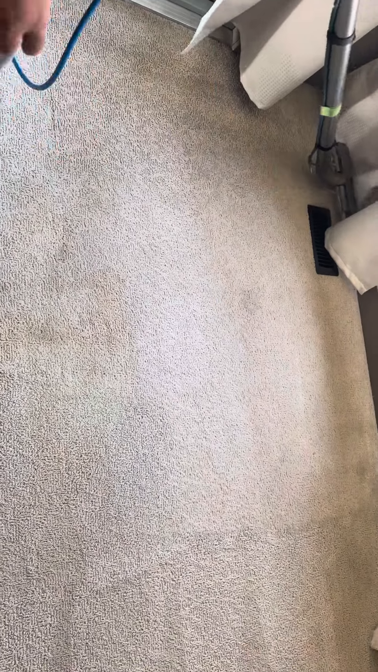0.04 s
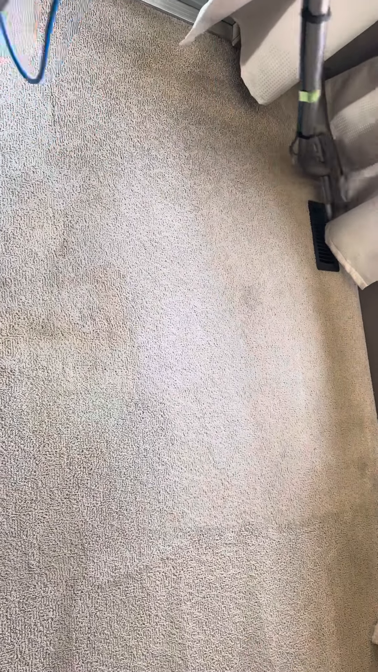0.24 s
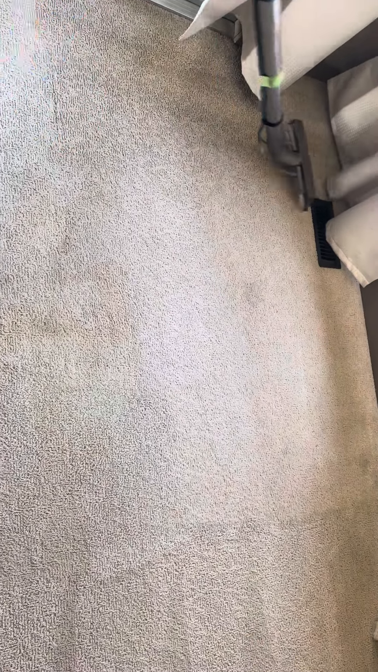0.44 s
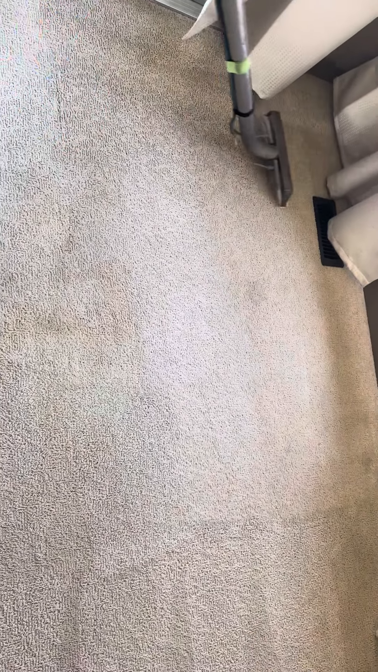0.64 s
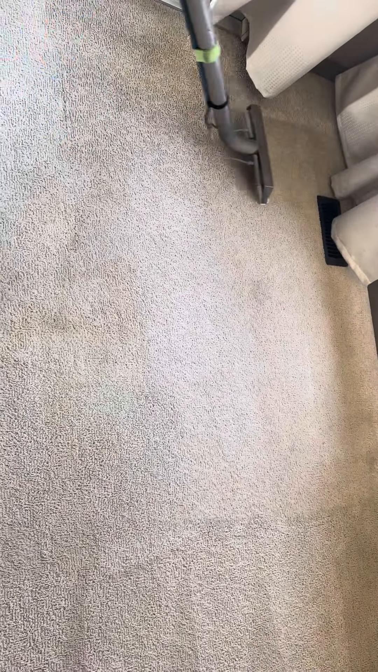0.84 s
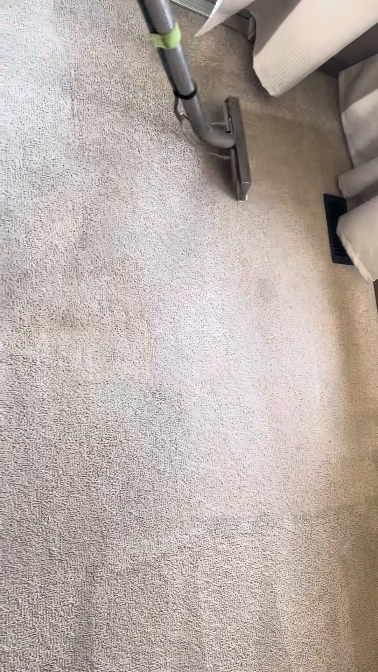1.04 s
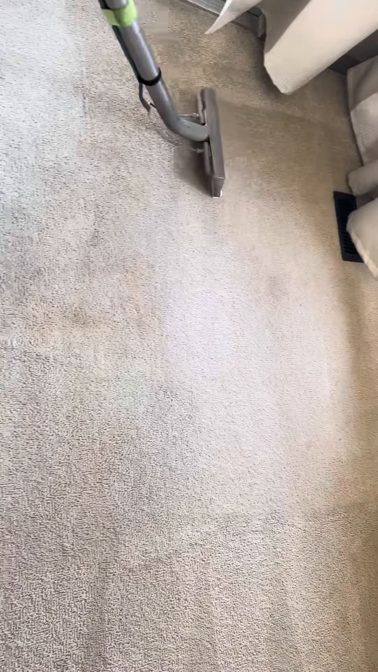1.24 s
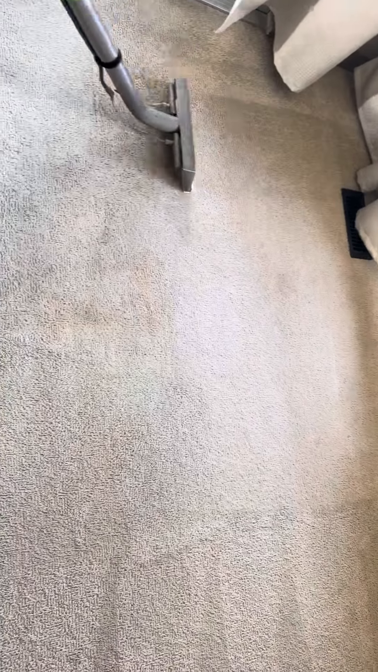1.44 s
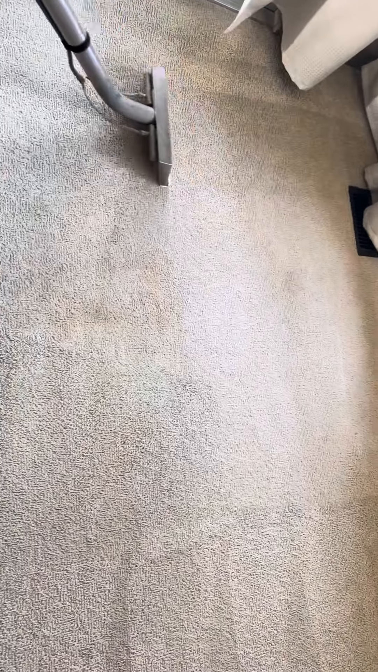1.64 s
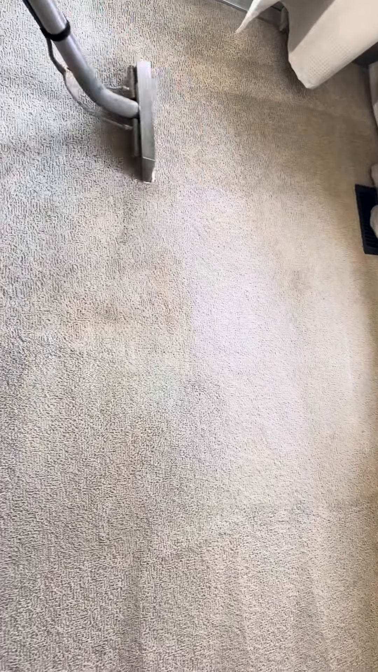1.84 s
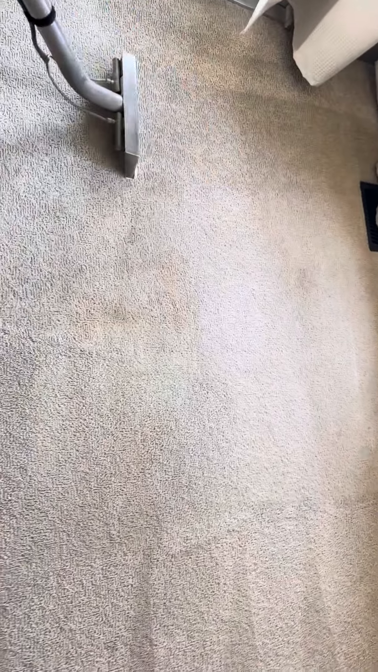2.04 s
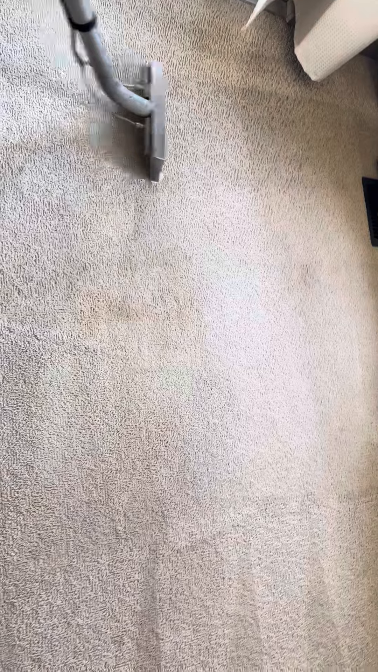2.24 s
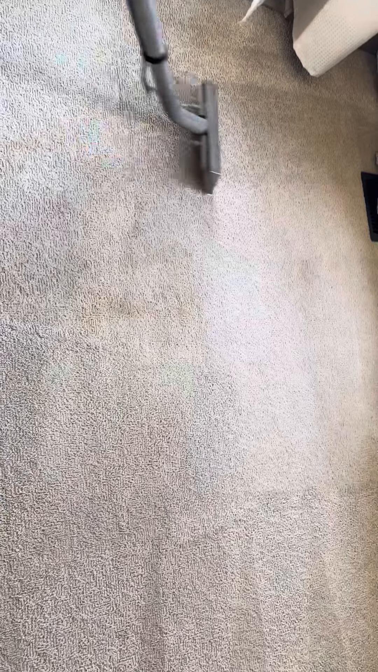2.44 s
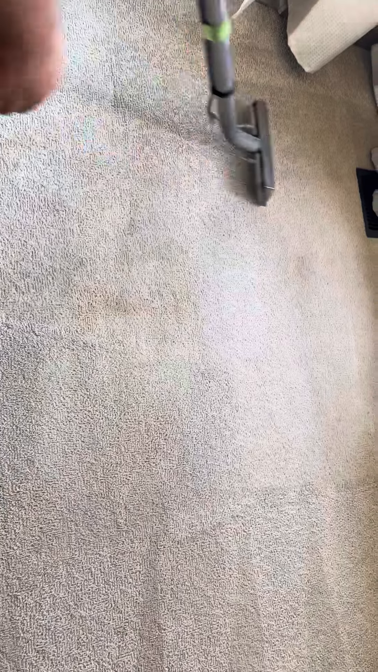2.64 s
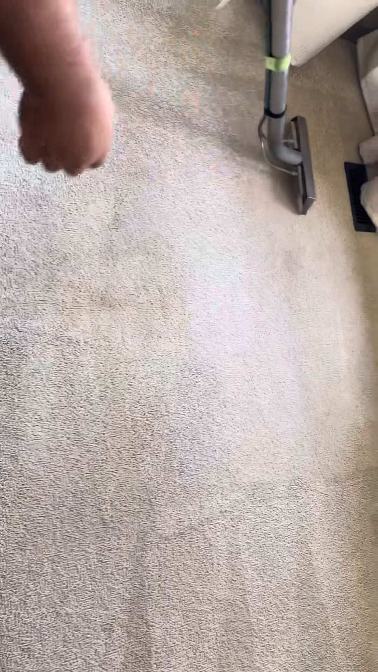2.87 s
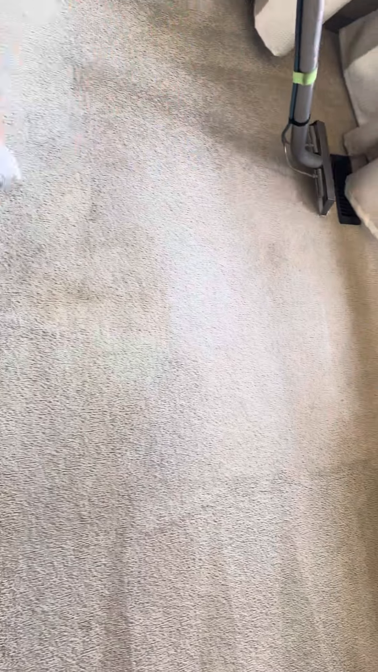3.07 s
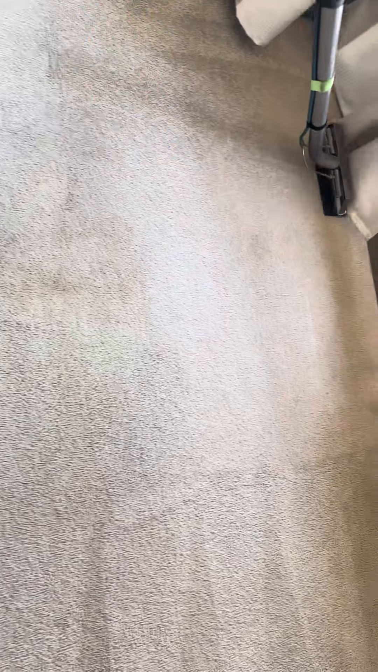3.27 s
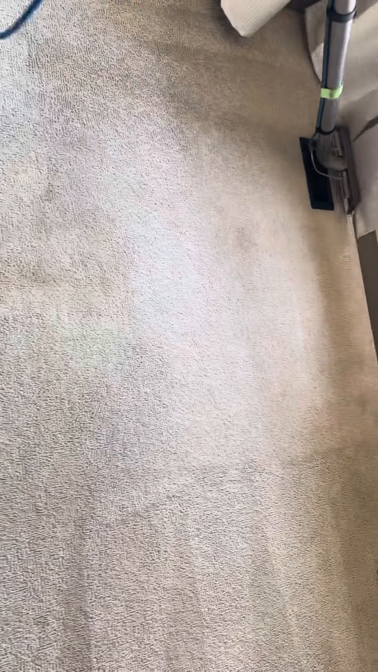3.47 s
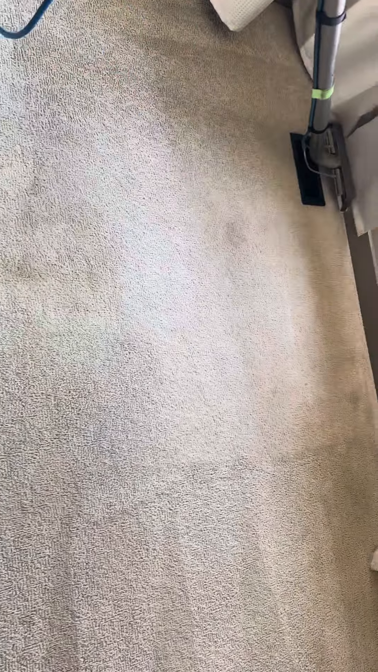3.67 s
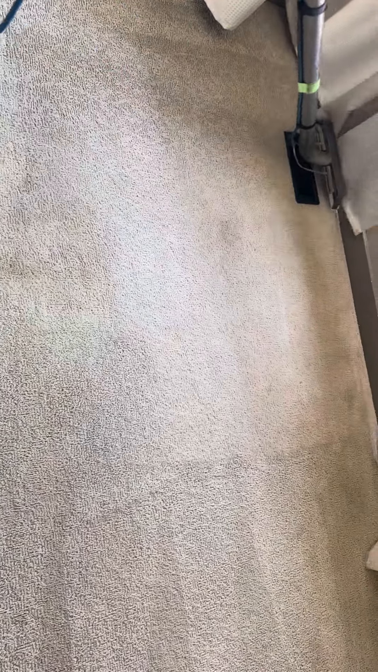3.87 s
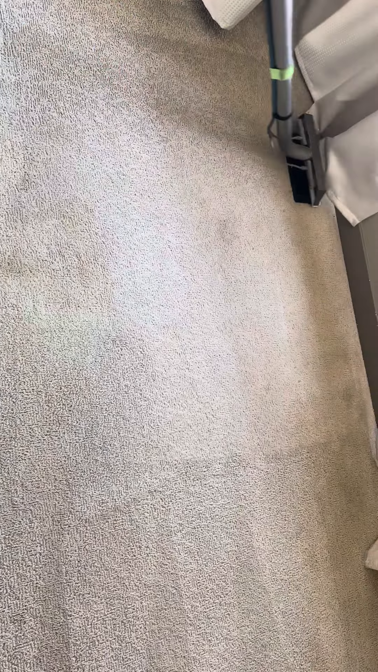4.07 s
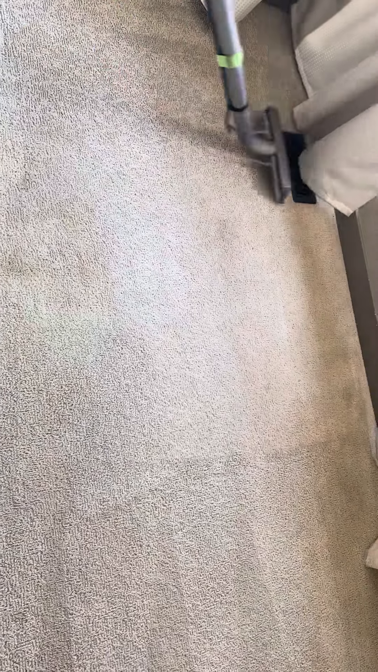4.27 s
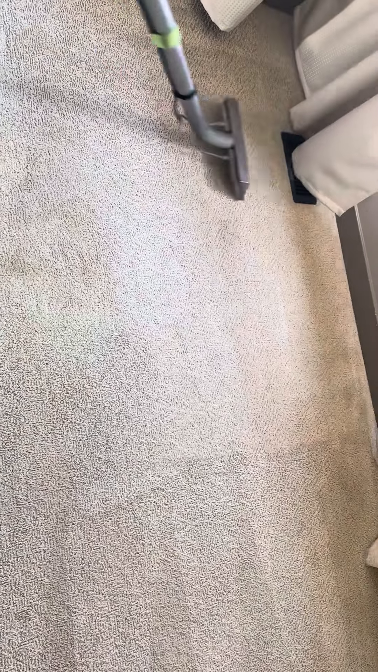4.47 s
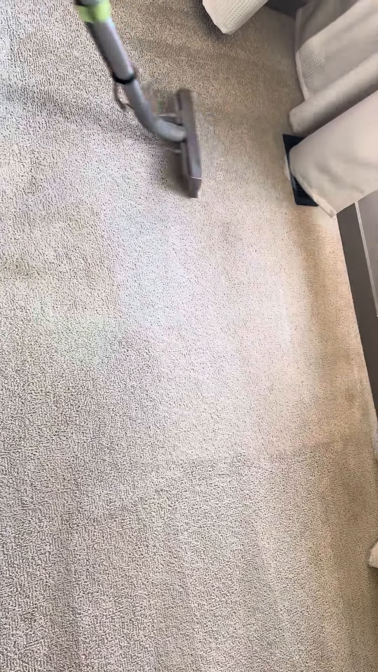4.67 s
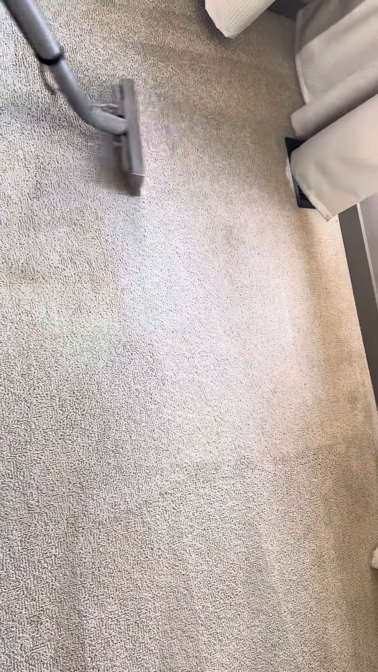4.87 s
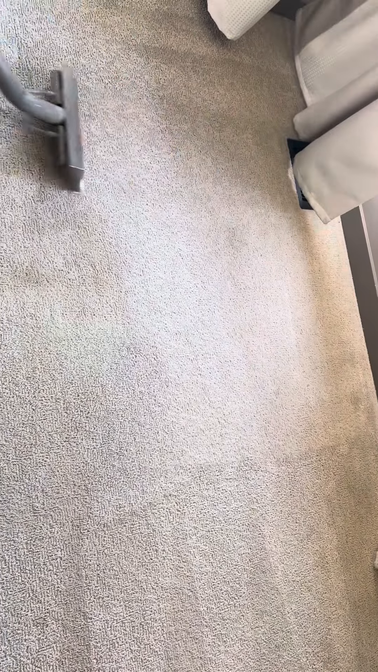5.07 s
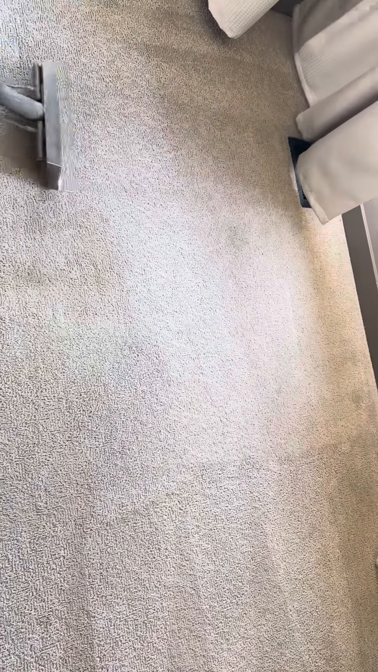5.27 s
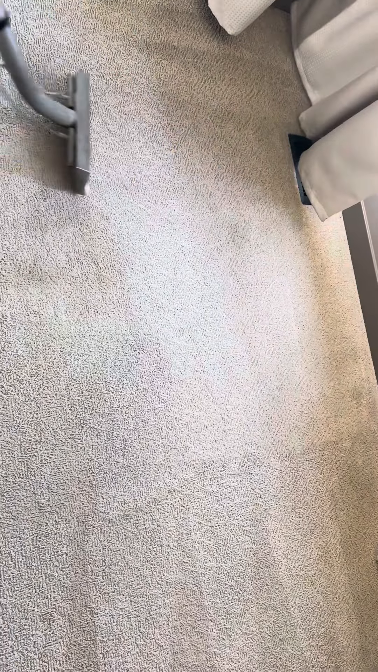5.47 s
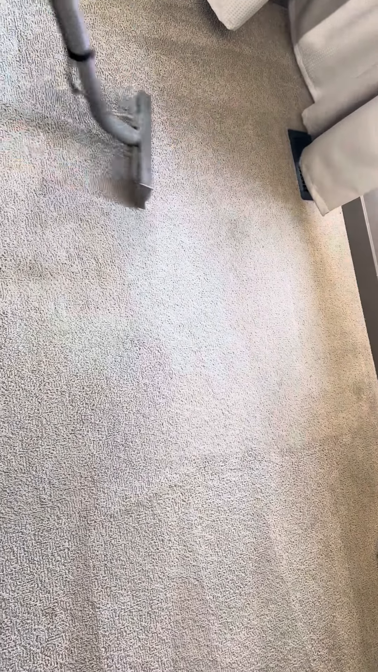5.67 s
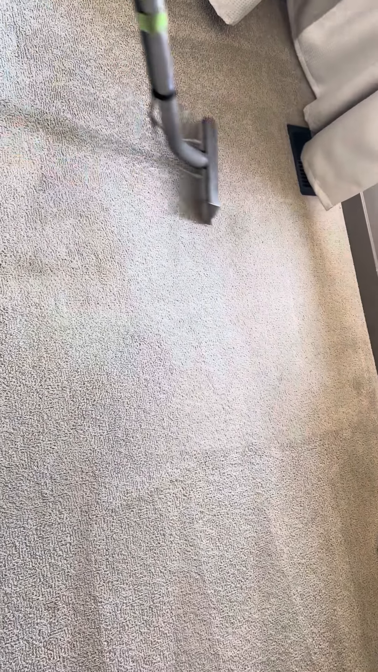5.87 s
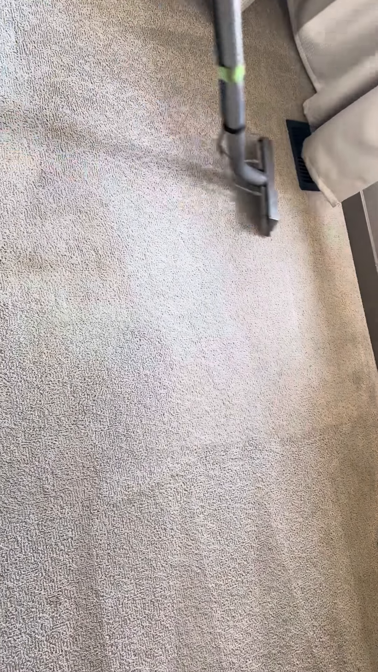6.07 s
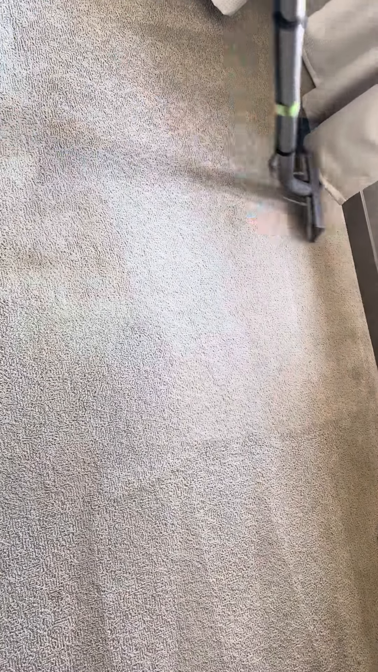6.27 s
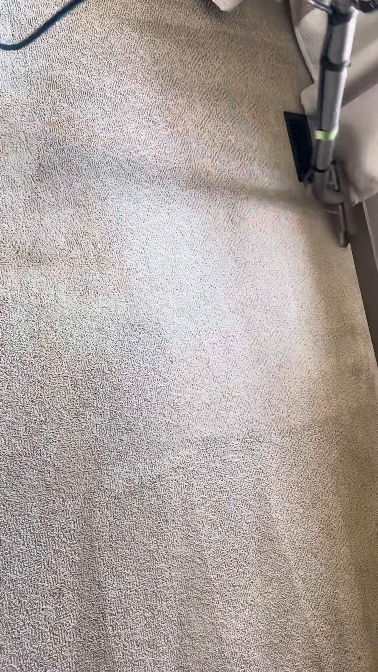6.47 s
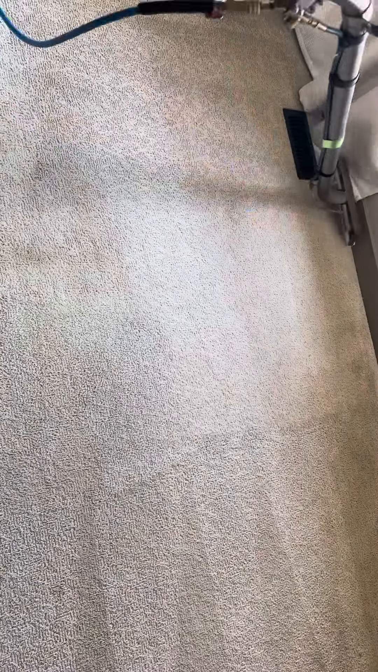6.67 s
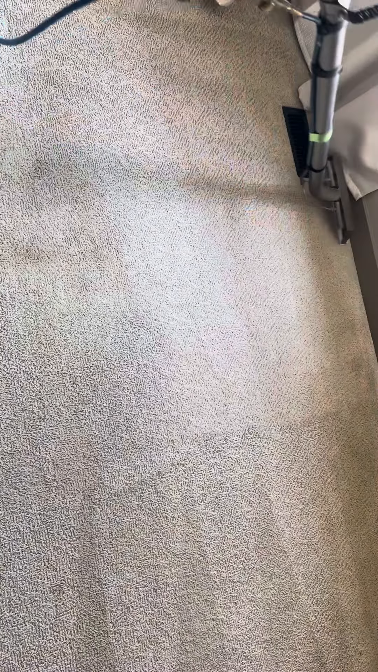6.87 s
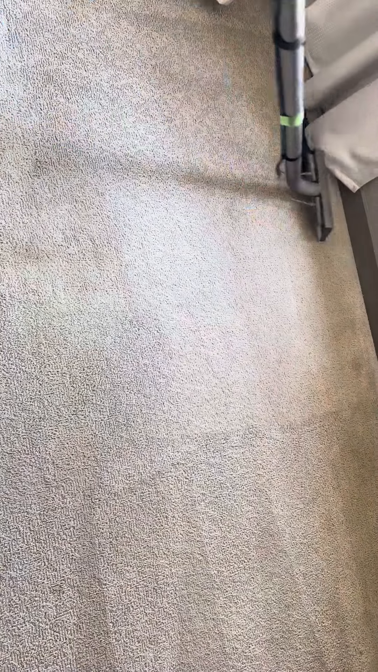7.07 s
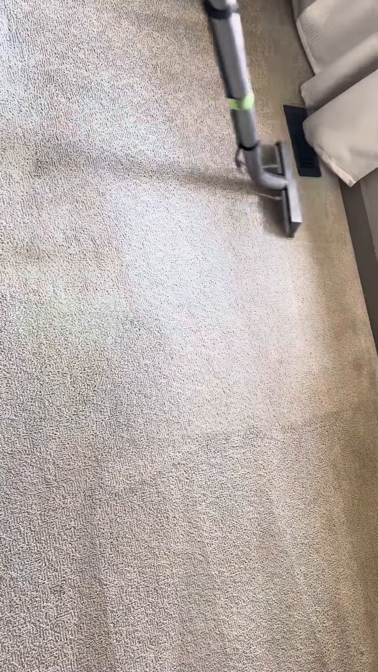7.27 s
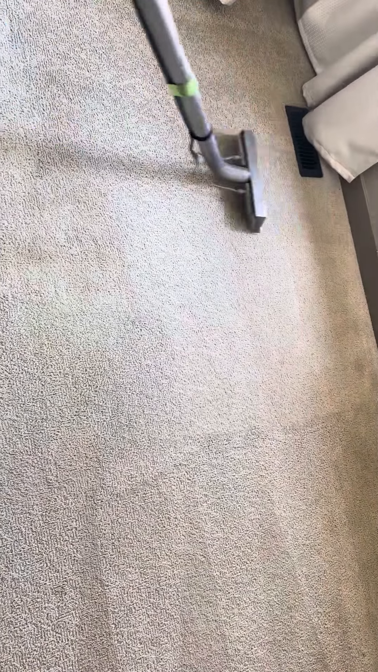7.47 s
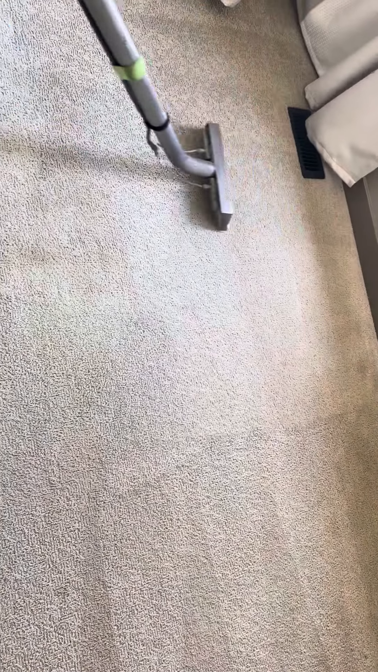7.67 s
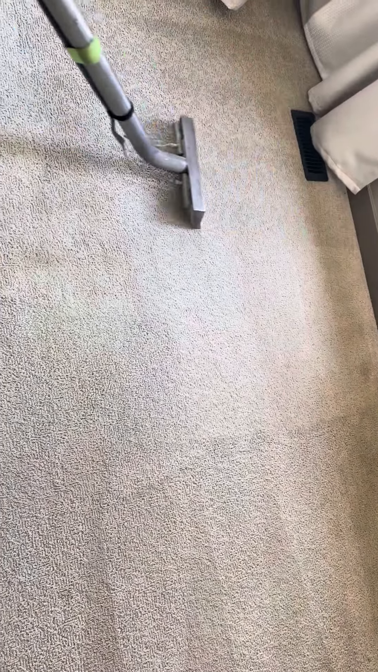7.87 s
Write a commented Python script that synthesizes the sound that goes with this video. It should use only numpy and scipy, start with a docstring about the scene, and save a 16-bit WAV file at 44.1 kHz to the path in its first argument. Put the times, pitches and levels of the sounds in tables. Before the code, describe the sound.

A carpet cleaning wand hisses with steady wet suction over a low machine hum, now and then rubbing and bumping against a sofa.

```python
"""Carpet extraction wand

A wand is drawn to and fro in a furnished room while its machine drones further off.
Air and water hiss into the slot; where a stroke turns, the head rubs and bumps along a sofa's foot.
Once it runs onto a floor vent, where the seal opens and the hiss sinks."""
import sys
import numpy as np
from scipy import signal
from scipy.fft import rfft, irfft
from scipy.io import wavfile
from scipy.ndimage import uniform_filter1d

SR = 44100
rng = np.random.default_rng(int(sys.argv[2]) if len(sys.argv) > 2 else 0)


def waveform_to_disk(signal):
    """Save audio, clipped to [-1, 1], as 16-bit WAV at the path in sys.argv[1]."""
    frames = np.transpose(np.atleast_2d(signal))
    scaled = np.clip(frames, -1, 1) * 32767
    samples = np.round(scaled).astype(np.int16)
    wavfile.write(sys.argv[1], SR, samples)


N = 349272
HOP = 256
TIME_S = np.arange(N) / SR
FRAME_S = np.arange(N // HOP + 5) * HOP / SR
BIN_HZ = np.fft.rfftfreq(4 * HOP, 1 / SR)
RUB_RISE_S, RUB_FALL_S = 0.014, 0.068

# Rubs of the head. Each row: start in s, length in s, scrape in relative dB, hiss surge in dB,
# hollow in relative dB, its centre in Hz, its glide in octaves, head ring in relative dB.
RUBS = [(0.221, 0.096, -34, 3, -42, 420, 0, -44), (0.261, 0.16, -30, 3, -33, 368, -0.55, -33.5),
        (3.186, 0.13, -32, 3, -24, 250, 0.5, -27), (3.27, 0.13, -32.5, 1.5, -30, 320, 0.2, -40),
        (3.857, 0.094, -31, 0, -31, 444, -0.4, -40), (4.034, 0.17, -34, 1.5, -32, 310, -0.15, -35),
        (4.165, 0.075, -28, 3, -42, 300, -0.2, -33), (6.262, 0.175, -30.5, 1.5, -29.5, 260, 0.5, -38),
        (6.542, 0.13, -24.5, 0, -28, 430, 0.43, -32.5), (6.641, 0.14, -38, 0.8, -42, 350, -0.2, -52),
        (7.01, 0.2, -31.5, 1.7, -34, 272, -0.23, -37)]


def gain_of(db):
    """Decibels to amplitude."""
    return 10 ** (np.asarray(db) / 20)


def unit_rms(x):
    """Scale to rms 1."""
    return x / np.sqrt(np.mean(x ** 2) + 1e-20)


def at_hz(rows, hz, column=1):
    """Table column interpolated over log frequency."""
    table = np.transpose(rows)
    return np.interp(np.log(hz + 1), np.log(table[0] + 1), table[column])


def per_frame(rows):
    """Time curve interpolated at every frame."""
    return np.interp(FRAME_S, *np.transpose(rows))[:, None]


def add(mix, start_s, sound):
    """Mix a sound in at start_s."""
    part = mix[..., round(start_s * SR):][..., :sound.shape[-1]]
    part += sound[..., :part.shape[-1]]


def gate(t, length_s, rise_s, fall_s):
    """Linear rise, hold and fall."""
    return np.clip(t / rise_s, 0, 1) * np.clip((length_s - t) / fall_s, 0, 1)


def coloured(x, spectrum):
    """Filter by a spectrum, keeping the power of white noise."""
    gain = unit_rms(gain_of(at_hz(spectrum, np.fft.rfftfreq(x.shape[-1], 1 / SR))))
    return irfft(rfft(x) * gain, x.shape[-1])


def resonate(x, hz, width_hz):
    """Double-pole resonance with a steady or moving centre; output rms 1."""
    r = np.exp(-np.pi * width_hz / SR)
    carrier = np.exp(2j * np.pi * np.cumsum(hz * np.ones(x.shape[-1])) / SR)
    return unit_rms((carrier * signal.lfilter([(1 - r) ** 2], [1, -2 * r, r ** 2], x / carrier)).real)


def wander(rate_hz, t=FRAME_S):
    """Slow noise of rms about 1 at times t."""
    count = len(FRAME_S)
    rolloff = 1 + (np.fft.rfftfreq(count, HOP / SR) / rate_hz) ** 2
    slow = irfft(rfft(rng.standard_normal(count)) / rolloff, count)
    return np.interp(t, FRAME_S, unit_rms(slow))


def patches(frames, bins):
    """Random time-frequency blotches of rms 1."""
    field = rng.standard_normal((len(FRAME_S), len(BIN_HZ)))
    return unit_rms(uniform_filter1d(uniform_filter1d(field, frames, axis=0), bins, axis=1))


def to_stereo(pair, gain):
    """Blend two unrelated signals into stereo and apply a gain; left and right oppose at 10-14 kHz."""
    # Each row: frequency in Hz, coherence 0-1, left phase lead in rad, left over right in dB.
    image = [(180, 1.0, 0.0, 0.0), (350.0, 0.84, -0.1, 1.8), (560.0, 0.2, -0.9, -2.1),
             (800.0, 0.42, 0.8, 0.6), (1150.0, 0.27, -0.2, 0.5), (1800.0, 0.63, 0.2, -0.1),
             (2900.0, 0.48, -1.9, -0.2), (3800.0, 0.28, -1.1, -0.8), (4700.0, 0.19, -3.7, 2.3),
             (5800.0, 0.81, -0.4, 0.1), (8800, 0.72, -2.1, 0), (10400, 0.99, -3.14, 0),
             (13800, 0.99, -3.14, 0), (15300, 0.68, -3.8, 0)]
    coherence, lead_rad, balance_db = (at_hz(image, BIN_HZ, column) for column in (1, 2, 3))
    framing = dict(nperseg=4 * HOP, noverlap=3 * HOP)
    padded = np.pad(pair, ((0, 0), (0, (len(FRAME_S) - 1) * HOP - N)))
    left, other = signal.stft(padded, **framing)[2].transpose(0, 2, 1)
    right = (coherence * left + np.sqrt(1 - coherence ** 2) * other) * np.exp(-1j * lead_rad)
    lean = gain_of(balance_db / 2)
    spectra = np.array([left * lean, right / lean]) * gain
    return signal.istft(spectra.transpose(0, 2, 1), **framing)[1][:, :N]


def reach():
    """Wand travel per frame: 0 at the sofa, 1 fully out on open carpet."""
    # Each row: time in s, reach 0-1.
    strokes = [(0, 0.037), (.6, 0.046), (1.5, 0.42), (2.05, 0.62), (2.6, 0.46), (3.15, 0.12), (4.15, 0),
               (5.0, 0.43), (5.45, 0.47), (6.35, 0.14), (6.75, 0.15), (7.9, 0.25)]
    return per_frame(strokes)


def opening(open_s=0.044, shut_s=0.045):
    """Seal opening per frame, 0-1: gives way fast, then slower, and snaps shut."""
    # Leaks, widest over the vent. Each row: start in s, end in s, opening 0-1.
    leaks = [(3.392, 4.004, 0.83), (4.064, 4.135, 0.5), (6.608, 6.755, 0.16)]
    total = np.zeros(len(FRAME_S))
    for start_s, end_s, size in leaks:
        giving = 1 - np.exp(-np.maximum(FRAME_S - start_s, 0) / open_s)
        total += size * giving * np.clip(1 + (end_s - FRAME_S) / shut_s, 0, 1)
    return total[:, None]


def steered(at_sofa, by_reach, by_opening):
    """Per-frame setting: its value at the sofa plus changes for full reach and open seal."""
    return at_sofa + by_reach * reach() + by_opening * opening()


def surge_db():
    """Extra hiss per frame while the head is pressed down and rubs."""
    return sum(db * gate(FRAME_S - start_s, length_s, RUB_RISE_S, RUB_FALL_S)
               for start_s, length_s, _, db, *_ in RUBS)[:, None]


def jet_db():
    """Level of the slot's jet per frame."""
    return steered(-34.5, by_reach=13, by_opening=-4.5) + 1.3 * surge_db()


def jet_excess_db():
    """Jet level relative to its median."""
    return jet_db() - np.median(jet_db())


def middle_db(centre_hz=1110, width_octaves=0.97):
    """The hollow middle of the rush swells and sinks from stroke to stroke."""
    # Each row: time in s, gain at the band centre in dB.
    swells = [(0, -1.5), (.7, .5), (1.2, 0.6), (1.8, 1.5), (2.15, -1.4), (2.75, 0.5), (3.3, 0), (3.7, -1.4),
              (4.5, 1), (5.25, -0.8), (5.8, 1.5), (6.5, -0.5), (6.95, 0.5), (7.9, 2)]
    return per_frame(swells) * np.exp(-(np.log2((BIN_HZ + 1) / centre_hz) / width_octaves) ** 2)


def spray(drops_per_s, drop_share):
    """Air noise with a share of its power in droplet ticks of uneven size."""
    air, drops = rng.standard_normal((2, N)), np.zeros((2, N))
    hit = rng.random((2, N)) < drops_per_s / SR
    sizes = rng.laplace(size=(2, N))[hit]
    drops[hit] = np.sign(sizes) * gain_of(4 * np.minimum(abs(sizes), 4))
    return np.sqrt(1 - drop_share) * air + np.sqrt(drop_share) * unit_rms(drops)


def suction(flicker_hz=3600, flicker_half_width_hz=2000):
    """A wide suction hiss, with a fine random flicker added around 2-5.5 kHz."""
    # Each row: frequency in Hz, relative spectral density in dB.
    air_spectrum = [(200, -20), (900, -3.5), (1650, -4.8), (2300, -2.9), (2900, -1), (3250, -2.8),
                    (3600, -2), (4100, -3.7), (4700, -.9), (5450, -3.4), (6200, -1.7), (8500, -2.3),
                    (9400, -3.3), (10600, -1.9), (12000, -2.7), (15500, -2.4)]
    treble = np.clip((BIN_HZ - 5000) / 5500, 0, 1)
    treble_db = steered(-1, by_reach=2.8, by_opening=10.5) - surge_db()
    field_db = steered(-25.2, by_reach=1.3, by_opening=-17) + surge_db() + middle_db()
    field_db += treble * treble_db + 0.3 * wander(29)[:, None]
    field_db += 0.8 * patches(frames=8, bins=10) + 1.3 * patches(frames=70, bins=3)
    flicker_band = np.exp(-((BIN_HZ - flicker_hz) / flicker_half_width_hz) ** 4)
    field_db += 2.7 * patches(frames=7, bins=3) * flicker_band
    colour = unit_rms(gain_of(at_hz(air_spectrum, BIN_HZ)))
    return to_stereo(spray(drops_per_s=2500, drop_share=0.14), colour * gain_of(field_db))


def slot_jet(usual_width_hz=3000):
    """The jet in the narrow slot sings broadly; a stronger jet spreads over a wider band."""
    centre_hz = steered(7015, by_reach=495, by_opening=920)
    width_hz = usual_width_hz * gain_of(0.28 * jet_excess_db())
    detune = (BIN_HZ - centre_hz) / (width_hz / 2)
    colour = 1 / (1 + detune ** 2 / 2 + detune ** 4)
    colour /= np.sqrt(np.mean(colour ** 2, axis=1, keepdims=True))
    level_db = jet_db() - 0.17 * wander(18)[:, None]
    field_db = level_db + 1.33 * patches(frames=9, bins=12) + 0.9 * patches(frames=60, bins=5)
    return to_stereo(spray(drops_per_s=2600, drop_share=0.067), colour * gain_of(field_db))


def machine_roar(base_db=-30.5, reach_db=-1.0, rumble_hz=100, fade_db_per_s=1.0, room_t60_s=0.3):
    """Low rush of machine and hose in a ringing room, fullest by the sofa; its rumble slowly fades."""
    # Each row: frequency in Hz, relative spectral density in dB.
    roar_spectrum = [(20, -34), (36, -6), (50, -6.5), (80, .5), (105, -2.5), (150, -1.8), (240, -3.5),
                     (370, -2), (480, -3.5), (800, -3.5), (1100, -6.5), (1600, -14.5), (3000, -17.5),
                     (8000, -25)]
    t = TIME_S[:SR // 2]
    room = rng.standard_normal((2, len(t))) * np.exp(-np.log(1000) * t / room_t60_s)
    room *= 0.6 / np.linalg.norm(room[0])
    room[:, 0] += 1  # direct path
    rush = coloured(irfft(rfft(rng.standard_normal((2, N))) * rfft(room, N), N), roar_spectrum)
    rumble_db = (2.5 - fade_db_per_s * FRAME_S[:, None]) / (1 + (BIN_HZ / rumble_hz) ** 4)
    field_db = base_db + rumble_db + reach_db * reach() + middle_db()
    # A tight seal makes a strong jet and lets less out around 520 Hz.
    field_db -= 0.3 * np.maximum(jet_excess_db(), 0) * np.exp(-(2 * (BIN_HZ / 520 - 1)) ** 2)
    field_db += 1.95 * patches(frames=16, bins=4)
    return to_stereo(unit_rms(rush), gain_of(field_db))


def machine_hum(drift=0.01179, waver=0.47, shake_rad=0.55):
    """Machine tones share one drifting speed; each wavers among the room's standing waves."""
    # Each row: frequency in Hz, level in dB, left phase lead in rad.
    tones = [(60.4, -47.5, 0), (124.3, -39.5, 0.028), (195.6, -43.5, 0.1), (258.2, -46, 0),
             (367, -52.5, 0.07)]
    clock_s = np.cumsum(1 + drift * wander(2.73, TIME_S)) / SR
    out = np.zeros((2, N))
    for hz, db, lead_rad in tones:
        level = gain_of(db) * unit_rms(1 + waver * wander(21, TIME_S))
        phase = 2 * np.pi * (hz * clock_s + rng.random()) + shake_rad * wander(13.6, TIME_S)
        out += np.sqrt(2) * level * np.sin(phase + np.array([[lead_rad], [-lead_rad]]) / 2)
    return out


def head_hoots():
    """The head hoots faintly: high when pulled out, low when pushed back or unsealed."""
    speed, leak = np.gradient(reach()[:, 0]), opening()[:, 0]
    pulling, pushing = uniform_filter1d(np.array([speed > 0, speed < 0], float), size=50, axis=1)
    out = np.zeros((2, N))
    for amount, hz, width_hz, db in ((pulling, 850, 340, -42),
                                     (pushing * (1 - leak), 560, 320, -40),
                                     (leak, 650, 110, -43)):
        hoot = resonate(rng.standard_normal((2, N)), hz, width_hz)
        out += gain_of(db) * np.interp(TIME_S, FRAME_S, amount) * hoot
    return out


def lip_rubs(judder_hz=60.3, judder_depth=0.34, jitter=0.345, hollow_width_hz=290):
    """The lip sticks and slips: a broad scrape, the gliding hollow of the gap, the ringing head."""
    # Each row: frequency in Hz, relative spectral density in dB.
    scrape_spectrum = [(60, -20), (150, -5), (280, 2.5), (480, 1), (720, 3), (1100, -3.5), (1400, -5.5),
                       (1750, -10), (4000, -39), (9000, -42)]
    # Each row: frequency in Hz, width in Hz, relative level in dB.
    head_modes = [(794, 83, -1.5), (937, 81, -5), (1062, 27, 0), (1390, 79, -23)]
    out = np.zeros((2, N))
    pace = 1 + jitter * wander(16, TIME_S)
    for start_s, length_s, scrape_db, _, hollow_db, hollow_hz, glide_octaves, ring_db in RUBS:
        t = TIME_S[:round(length_s * SR)]
        clock_s = np.cumsum(np.interp(start_s + t, TIME_S, pace)) / SR
        slips = 1 + judder_depth * np.cos(2 * np.pi * judder_hz * clock_s)
        friction, puffs, knocks = slips * rng.standard_normal((3, 2, len(t)))
        scrape = unit_rms(coloured(friction, scrape_spectrum))
        hollow = resonate(puffs, hollow_hz * 2 ** (glide_octaves * (t / length_s - 0.5)), hollow_width_hz)
        ring = sum(gain_of(db) * resonate(knocks, hz, width_hz) for hz, width_hz, db in head_modes)
        rub = gain_of(scrape_db) * scrape + gain_of(hollow_db) * hollow
        rub += gain_of(ring_db) * unit_rms(ring)
        add(out, start_s, gate(t, length_s, RUB_RISE_S, RUB_FALL_S) * rub)
    return out


def hose_drone(waver=0.23, shake_rad=0.86):
    """Shifting flow holds a low hose resonance sounding: a soft, unsteady drone."""
    # Each row: start in s, length in s, level in dB, frequency in Hz.
    drones = [(.375, 0.14, -29.5, 139), (1.9, 0.12, -36, 155), (2.35, 0.28, -39, 182),
              (4.43, 0.18, -32.5, 150.5), (4.81, 0.14, -35, 259.3), (4.85, 0.18, -30, 198.2),
              (4.917, .34, -33, 118.6), (5.1, 0.16, -30, 191), (5.58, 0.2, -33, 143),
              (7.49, 0.11, -28, 138)]
    out = np.zeros(N)
    for start_s, length_s, db, hz in drones:
        t = TIME_S[:round(length_s * SR)]
        level = gain_of(db) * unit_rms(1 + waver * wander(25, t))
        phase = 2 * np.pi * (hz * t + rng.random()) + shake_rad * wander(27, t)
        envelope = gate(t, length_s, rise_s=0.044, fall_s=0.084)
        add(out, start_s, level * envelope * np.sqrt(2) * np.sin(phase))
    return out


def head_bumps(thud_rise_s=0.003, thud_t60_s=0.085, clack_rise_s=0.0007, clack_t60_s=0.08):
    """The head hits floor and vent: a floor thud and a dull clack, both cushioned by the pile."""
    # Each row: start in s, thud in relative dB, thud pitch in Hz, clack in relative dB.
    bumps = [(3.142, -18, 138, -32), (3.164, -17, 172, -30), (3.195, -14.5, 72, -27),
             (3.338, -18, 300, -28), (3.531, -16, 165, -15), (3.546, -17.5, 135, -26),
             (3.874, -26, 340, -28), (4.166, -29, 200, -28), (4.209, -19, 66, -40), (4.226, -15, 135, -42),
             (6.262, -15.5, 267, -22), (6.295, -19.5, 185, -27), (6.522, -17.5, 230, -16),
             (6.546, -15, 135, -20)]
    # Each row: frequency in Hz, relative spectral density in dB.
    clack_spectrum = [(40, -4), (130, 9), (850, 8), (1500, -3), (2700, -6), (5000, -27), (12000, -38)]
    t = TIME_S[:SR // 2]
    thud_envelope = (1 - np.exp(-t / thud_rise_s)) * np.exp(-np.log(1000) * t / thud_t60_s)
    clack_envelope = (1 - np.exp(-t / clack_rise_s)) * np.exp(-np.log(1000) * t / clack_t60_s)
    thuds, clacks = np.zeros(N), np.zeros((2, N))
    for start_s, thud_db, hz, clack_db in bumps:
        add(thuds, start_s, gain_of(thud_db) * thud_envelope * np.sin(2 * np.pi * hz * t))
        add(clacks, start_s, gain_of(clack_db) * clack_envelope * rng.standard_normal((2, len(t))))
    return thuds, coloured(clacks, clack_spectrum)


def edge_slurps(roughness=0.35):
    """Wet air whistles past the edge of the tipping head, sinking in pitch as the gap widens."""
    # Each row: start in s, length in s, relative level in dB, first and last pitch in Hz, width in Hz.
    slurps = [(3.18, .15, -35, 4900, 4400, 1100), (3.24, .12, -37, 6400, 6000, 600),
              (3.42, .21, -42, 1510, 1350, 110), (6.25, .16, -38.5, 5100, 4800, 900),
              (6.98, .18, -40, 5700, 4600, 1100)]
    out = np.zeros((2, N))
    for start_s, length_s, db, from_hz, to_hz, width_hz in slurps:
        t = TIME_S[:round(length_s * SR)]
        hz = from_hz + (to_hz - from_hz) * t / length_s
        whistle = resonate(rng.standard_normal((2, len(t))), hz, width_hz)
        whistle *= 1 + roughness * wander(60, t)
        add(out, start_s, gain_of(db) * gate(t, length_s, rise_s=0.02, fall_s=0.05) * unit_rms(whistle))
    return out


def scene():
    """Wand, hose and machine in stereo; thuds and hose drone are alike in both channels."""
    thuds, clacks = head_bumps()
    contact = to_stereo(lip_rubs() + edge_slurps() + clacks, gain=0.86)
    hoots = to_stereo(head_hoots(), gain_of(middle_db()))
    hiss = suction() + slot_jet()
    machine = machine_roar() + machine_hum()
    return hiss + machine + hoots + contact + hose_drone() + thuds


def record(dry, low_cut_hz=45, band_limit_hz=15800):
    """Microphone low cut, then the recorder's band limit."""
    low_cut = signal.butter(3, low_cut_hz, "highpass", fs=SR, output="sos")
    taps = signal.firwin(511, band_limit_hz, window=("kaiser", 9), fs=SR)
    return signal.oaconvolve(signal.sosfilt(low_cut, dry), taps[None], "same", axes=1)


dry = scene()
out = record(dry)
waveform_to_disk(out)
```